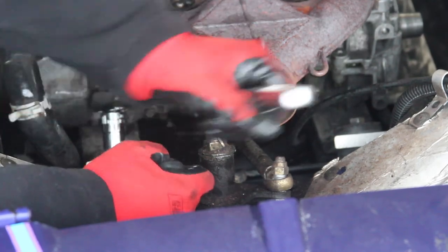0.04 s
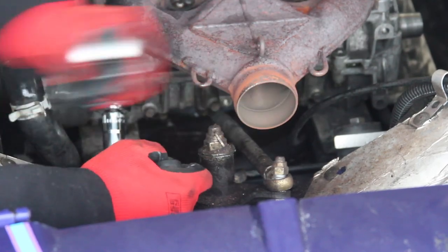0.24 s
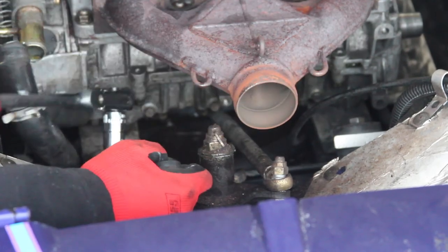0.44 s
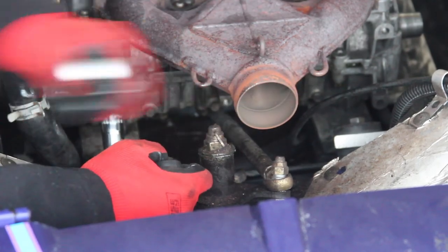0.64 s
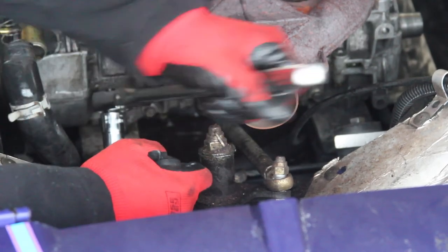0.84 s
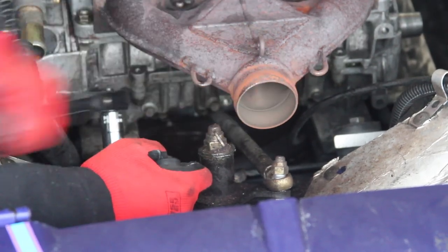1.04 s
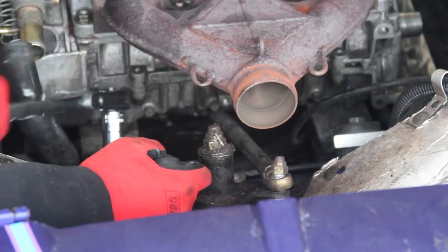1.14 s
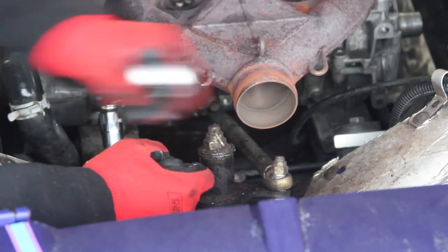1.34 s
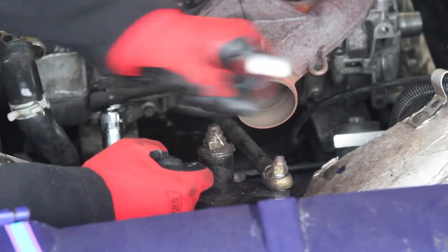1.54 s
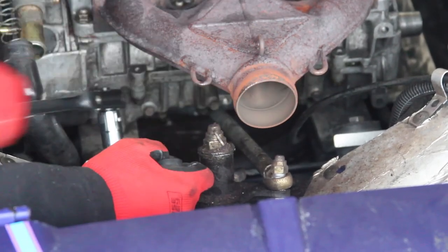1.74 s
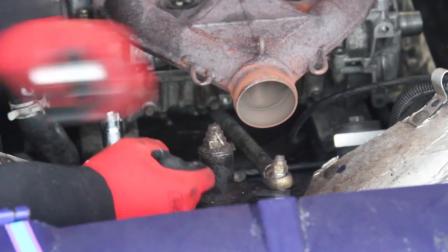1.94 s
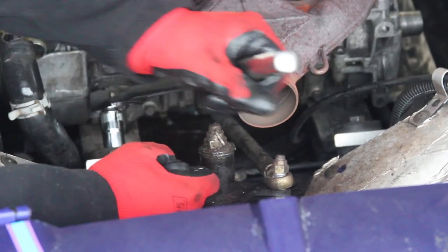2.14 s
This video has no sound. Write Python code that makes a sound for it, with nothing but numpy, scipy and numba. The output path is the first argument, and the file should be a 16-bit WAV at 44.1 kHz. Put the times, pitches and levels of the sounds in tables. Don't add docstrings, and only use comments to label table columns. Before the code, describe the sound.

Close-miked socket ratchet in an open engine bay, clicking on each back swing and clunking as it bites. After the first clunk a pipe is struck and rings, then two more strokes follow in a humming, echoing garage.

```python
import sys
import numpy as np
from scipy import signal
from scipy.fft import rfft, irfft
from scipy.io import wavfile
from scipy.ndimage import uniform_filter1d
from numba import njit

SR = 44100
rng = np.random.default_rng(int(sys.argv[2]) if len(sys.argv) > 2 else 0)


def bounce(signal):
    frames = np.transpose(np.atleast_2d(signal))
    limited = np.clip(frames, -1, 1)
    pcm = np.round(limited * 32767).astype(np.int16)
    wavfile.write(sys.argv[1], SR, pcm)


def rack_gain(trim_db):
    fader = np.asarray(trim_db, float)
    return 10 ** (fader / 20)


N = 97020

GRIT_DB = 2


def unit(x):
    return x / np.sqrt(np.mean(x ** 2))


def noise(points, tilt_db=0.):
    hz, level = np.array(points).T
    f = np.maximum(np.arange(N // 2 + 1) * SR / N, 1)
    db = np.interp(np.log(f), np.log(hz), level)
    db = db + tilt_db * np.log2(np.maximum(f, 300) / 4000)
    return unit(irfft(rfft(rng.standard_normal(N)) * rack_gain(db), N))


def ring(x, hz, width):
    b, a = signal.iirpeak(min(hz, .45 * SR), hz / max(width, 2), SR)
    return signal.lfilter(b, a, x)


def body(x, peaks, spread_db=0.):
    chance = rng.standard_normal(len(peaks))
    out = 0
    for k, (hz, width, db) in enumerate(peaks):
        out = out + (-1) ** k * rack_gain(db + spread_db * chance[k]) * ring(x, hz, width)
    return out


def grit(db):
    steps = np.repeat(rng.standard_normal(N // 40 + 1), 40)
    return rack_gain(db * uniform_filter1d(steps, size=20)[:N])


def burst(t, rise, fall):
    t = np.maximum(t, 0)
    return (1 - np.exp(-t / rise)) * np.exp(-t / fall)


def slow_noise(size):
    smooth = uniform_filter1d(rng.standard_normal(N), size=size)
    return unit(uniform_filter1d(smooth, size=size))


# (frequency [Hz], level [dB])
HUM_COLOUR = [(15, -4), (25, -9.5), (354, -4.5), (463, -1), (531, -9.5), (840, -2.5), (5880, -24),
              (13200, -43.5), (16000, -34)]
# (frequency [Hz], width [Hz], level [dB])
WHINE = [(12600, 920, -64), (13200, 400, -61.5), (14200, 900, -69), (66.7, 6.7, -56)]


def garage():
    hum_db = -39.5 + 1.42 * slow_noise(3000)
    whine = 0
    for hz, width, db in WHINE:
        narrow = ring(ring(rng.standard_normal(N), hz, width), hz, width)
        whine = whine + rack_gain(db) * unit(narrow)
    return rack_gain(hum_db) * noise(HUM_COLOUR) + whine


# (time [s], level [dB], decay [ms], tilt [dB per octave])
KNOCKS = [
    (0.0931, -26.5, 22.5, -0.5),
    (.174, -43, 16, 4),
    (0.28, -20.5, 21, 2),
    (0.952, -28, 16, -0.5),
    (1.500, -23, 19, -2),
    (1.591, -32, 30, -1),
    (1.656, -24.5, 9.3, 3),
    (1.916, -23.5, 15, 4.5),
    (1.903, -24, 7.2, 1.5),
    (2.075, -37.5, 12, 1.5),
]
# (frequency [Hz], level [dB])
KNOCK_COLOUR = [(71, -34), (150, -6), (892, 2), (1860, -6), (2200, -2.5), (3170, -11), (13000, -32.5),
                (16000, -55)]
# (time [s], level [dB])
SHUDDER = [(.39, -29), (1.09, -30), (1.77, -34.5)]


def knocks(t):
    soft, swell = 0, 0
    for s, db, ms, tilt in KNOCKS:
        env = burst(t - s, 0.0012, ms / 1000) * grit(GRIT_DB)
        soft = soft + rack_gain(db) * env * noise(KNOCK_COLOUR, tilt)
    for s, db in SHUDDER:
        swell = swell + rack_gain(db + 3) * burst(t - s, 0.14, 0.08)
    shudder_hz = 78
    return soft + swell * np.sin(2 * np.pi * shudder_hz * t)


# (start [s], end [s], level [dB])
SWINGS = [
    (0.153, 0.39, -28),
    (0.927, 1.056, -30.5),
    (1.532, 1.73, -32),
]
# (frequency [Hz], level [dB])
SWING_COLOUR = [(59, -43), (100, -35), (521, 3), (1750, -3), (2020, -4), (6080, -20), (8000, -49),
                (10400, -45), (17600, -120)]


def swings(t):
    grow = 0
    for start, end, db in SWINGS:
        rise = np.clip((t - start) / (end - start), 0, 1) ** 0.8
        grow = grow + rack_gain(db) * rise * np.exp(-np.maximum(t - end, 0) / 0.009)
    flutter = unit(uniform_filter1d(rng.standard_normal(N), size=500))
    return grow * rack_gain(2 * flutter) * grit(0.57) * noise(SWING_COLOUR)


# (time [s], level [dB], chatter [ms], loudest note [Hz], share into the block [dB])
PAWL_DROPS = [(0.2245, -42, 4.6, 6300, 13), (0.2291, -21, 5, 11730, -6), (0.2833, -22.5, 7.7, 11400, -16),
              (0.3257, -32, 12, 14200, -7), (0.34, -25, 15, 3700, 0), (.9543, -39, 11, 3460, -12),
              (0.987, -25.5, 20, 8500, -10), (1.0252, -28, 13, 8800, -11), (1.0609, -26.5, 15, 4840, 4.5),
              (1.6328, -31.5, 20, 4960, -2.5), (1.661, -30, 16, 13000, 1.5), (1.704, -31, 4.9, 3340, -4),
              (1.7088, -19.5, 14, 7980, -2), (1.7298, -29, 30, 9890, 5.5), (1.8595, -26.5, 15, 8130, -23)]
# (frequency [Hz], width [Hz], level [dB])
PAWL_RINGS = [(2180, 53, -4), (3460, 140, 3), (4060, 750, -13), (4730, 110, 9), (7020, 230, -3.5),
              (7760, 350, 6), (9200, 200, 3), (9500, 160, -9), (11770, 200, 2), (12100, 160, -10),
              (14400, 240, 0.5)]
# (frequency [Hz], level [dB])
PAWL_COLOUR = [(800, 4), (2000, -20), (3500, 15.5), (6000, 7.5), (9000, 7), (12000, 8), (14000, 2),
               (16000, 4)]
# (frequency [Hz], width [Hz], level [dB])
BLOCK = [(350, 64, -6.5), (761.3, 16.3, 1.5), (1000, 280, -12.5), (1773, 246, -7), (2370, 340, -13),
         (2810, 200, -10.5), (3485, 140, -14), (4470, 400, -17), (6860, 100, -25.5), (7600, 80, -33)]


def snap_twice(u, fall):
    return burst(u, .00012, fall) + rack_gain(-2) * burst(u - .0053, .00012, fall)


def pawl(t):
    out = np.zeros(N)
    block_gain = 1 / np.std(body(rng.standard_normal(N), BLOCK))
    for s, db, ms, hz, block_db in PAWL_DROPS:
        u = t - s
        let_go = 1 + np.exp(np.clip((u - ms / 1000) / 0.004, -50, 50))
        chatter = burst(u, 0.0004, 1.4 * ms / 1000) / let_go
        snap = rack_gain(7) * snap_twice(u, .0014)
        tail = rack_gain(-9.5) * burst(u, 0.00078, 0.023)
        env = (1.21 * chatter + snap + tail) * grit(GRIT_DB)
        force = env * rng.standard_normal(N)
        rings = body(force, PAWL_RINGS, 3)
        rings = rack_gain(-6) * rings * np.sqrt(np.sum(env ** 2) / np.sum(rings ** 2))
        note = rack_gain(-3) * snap_twice(u, .005) * np.sin(2 * np.pi * hz * u)
        block = rack_gain(block_db) * block_gain * body(force, BLOCK)
        out += rack_gain(db - 6.5) * (env * noise(PAWL_COLOUR) + rings + note + block)
    return out


# (time [s], frequency [Hz], level [dB], decay [ms])
THUDS = [
    (0.2821, 258, -25.5, 12),
    (0.3689, 248, -2, 7),
    (0.406, 155, -21.5, 27),
    (.954, 1370, -24, 15),
    (1.079, 350, -18, 12),
    (1.753, 365, -27, 6.6),
    (1.753, 1580, -27, 6.7),
    (1.92, 1340, -12.5, 11),
]


def thuds(t):
    out = 0
    for s, hz, db, ms in THUDS:
        out = out + rack_gain(db) * burst(t - s, 0.006, ms / 1000) * np.sin(2 * np.pi * hz * (t - s))
    return out


def strike(t, row, peaks, blow_colour, grind_colour, ring_db, struck_db, fall, tilts=(0, 0), panel=0):
    s, blow_db, grind_db, length, bounce_ms = row
    u = t - s
    rise = 0.0004
    blow = burst(u, rise, fall) + .55 * burst(u - bounce_ms / 1000, rise, fall)
    blow = blow * grit(GRIT_DB) * rack_gain(blow_db)
    crack = rack_gain(blow_db) * burst(u, 0.00024, 0.0012) * noise(blow_colour, 1)
    fade_db = -32.5 * np.clip(u, 0, length) - 130 * np.maximum(u - length, 0)
    grind = burst(u, 0.0017, 9.7) * rack_gain(grind_db + fade_db) * grit(1.36)
    white = rng.standard_normal(N)
    gain = 1 / np.std(body(white, peaks))
    force = (rack_gain(struck_db) * blow + rack_gain(ring_db) * grind) * white
    rung = gain * body(force, peaks)
    direct = blow * noise(blow_colour, tilts[0]) + grind * noise(grind_colour, tilts[1])
    return uniform_filter1d(grind, size=400) * panel + crack + direct + rung


def boom(t, notes):
    first_hz, second_hz, db = notes
    out = 0
    for hz in (first_hz, second_hz):
        waver = rack_gain(2 * slow_noise(700))
        out = out + waver * np.sin(2 * np.pi * (hz * t + rng.random()))
    return rack_gain(db) * out


# (time [s], blow level [dB], grind level [dB], grind length [s], bounce [ms])
CLUNKS = [
    (0.3689, -8, -20, 0.14, 2.7),
    (1.0741, -5, -20.5, 0.15, 4.15),
    (1.753, -8.5, -22.5, 0.094, 6.2),
]
# (blow tilt [dB per octave], grind tilt [dB per octave])
CLUNK_TILTS = [(8, 2), (4, 0), (3, 2)]
# (first note [Hz], second note [Hz], level re grind [dB])
BOOMS = [(234.2, 200, -17), (330.2, 378, -2.5), (328.7, 368, -5)]
# (frequency [Hz], width [Hz], level [dB])
BLOCK_FIRST = [(284, 130, -1), (735, 76, 2.5), (952, 99, -3), (1375, 91, -10), (1694, 110, -5.5),
               (2150, 460, -8), (2936, 150, -12), (3500, 90, -17), (4770, 130, -20)]
BLOCK_LAST = [(350, 57, -4.5), (747, 33, -6.5), (1414, 72, -17), (1635, 120, -9.5), (1770, 48, -8.5),
              (2160, 160, -14.5), (3020, 57, -15), (3700, 480, -25.5)]
# (frequency [Hz], level [dB])
BLOW_COLOUR = [(59, -36), (130, -18), (570, -8), (991, 21.5), (2750, 9), (3050, 9.5), (3940, 4), (7770, -5),
               (16000, -24)]
GRIND_COLOUR = [(40, -48), (100, -27.5), (220, -1.5), (360, -5), (490, -23), (800, -12), (1800, -17.5),
                (16000, -61.5)]


def clunks(t):
    out = 0
    blocks = (BLOCK_FIRST, BLOCK, BLOCK_LAST)
    for row, tilts, notes, peaks in zip(CLUNKS, CLUNK_TILTS, BOOMS, blocks):
        out = out + strike(t, row, peaks, BLOW_COLOUR, GRIND_COLOUR, ring_db=0, struck_db=-3.5,
                           fall=0.0062, tilts=tilts, panel=boom(t, notes))
    return out


# (time [s], blow level [dB], scrape level [dB], scrape length [s], bounce [ms])
TAP = [(.7570, -5, -27, 0.17, 4.2)]
# (frequency [Hz], width [Hz], level [dB])
PIPE = [(698, 24, -8), (2220, 28, -12), (2585, 45, -6), (3400, 48, -10), (4150, 60, -12), (4940, 35, -10),
        (5880, 70, -11), (7540, 80, -16), (10750, 340, -25), (11060, 510, -25), (13000, 1000, -29)]
# (frequency [Hz], level [dB])
TAP_COLOUR = [(120, -54), (200, -37), (671, -29), (1450, -5), (2250, -6.5), (5840, -2.5), (6880, -12),
              (13600, -9), (16000, -29)]
PIPE_COLOUR = [(59, -58), (100, -24), (350, -6), (461, -12), (691, -6), (1450, -15.5), (2520, -8),
               (13200, -62), (16000, -45)]


def pipe_tap(t):
    return strike(t, TAP[0], PIPE, TAP_COLOUR, PIPE_COLOUR, ring_db=-6, struck_db=-3.5, fall=0.0036)


PIPE_HZ = [2226, 5950, 697, 2218, 2430, 2562, 2606, 3381, 4161, 4936, 5755, 5900, 7564]
# (level [dB], t60 [s], rise [s])
PIPE_NOTES = [(18, 0.0071, 0.0022), (-16, 0.081, 0.0022), (-36, .6, .002), (-31, 0.9, 0.0022),
              (-42, 0.7, .002), (-36, 1, .002), (-31, 1., .002), (-37, 0.13, 0.0015), (-47, 0.84, .002),
              (-61, 0.42, 0.0017), (-37, .41, .002), (-41, 0.47, .002), (-54, 0.46, .002)]
# (frequency [Hz], level [dB], time to the top [s], width [s])
PIPE_HUM = (695, -13, .019, .013)


def pipe_notes(t):
    u = np.maximum(t - .7572, 0)
    hz, db, top, width = PIPE_HUM
    swell = burst(u, .006, 9) * np.exp(-((u - top) / width) ** 2 / 2)
    out = rack_gain(db) * swell * np.sin(2 * np.pi * hz * u)
    for hz, (db, t60, rise) in zip(PIPE_HZ, PIPE_NOTES):
        out = out + rack_gain(db) * burst(u, rise, t60 / np.log(1000)) * np.sin(2 * np.pi * hz * u)
    return out


# (frequency [Hz], t60 [s])
ROOM_T60 = [(100, 0.079), (350, 1), (900, 1), (2000, 1), (6000, 0.12), (14000, 0.37)]


def room(x, t):
    hz_points, t60_points = np.array(ROOM_T60).T
    tail = 0
    for hz in 90 * 2 ** np.arange(0, 7.6, .5):
        t60 = np.interp(np.log(hz), np.log(hz_points), t60_points)
        tail = tail + ring(rng.standard_normal(N), hz, hz / 1.05) * rack_gain(-60 * t / t60)
    tail = tail * (t > 0.0032)
    tail = tail / np.sqrt(np.sum(tail ** 2))
    return signal.fftconvolve(x, tail)[:N] * rack_gain(-11.5)


def scene():
    t = np.arange(N) / SR
    close = knocks(t) + swings(t) + pawl(t) + clunks(t) + pipe_tap(t)
    return (garage() + close + room(close, t) + thuds(t) + pipe_notes(t))[None]


@njit
def follow(x, fall):
    e, out = 0., np.empty(len(x))
    for i in range(len(x)):
        e = max(abs(x[i]), e * fall)
        out[i] = e
    return out


def band_limit(x):
    return signal.sosfilt(signal.butter(12, 16370, fs=SR, output="sos"), x)


def record(dry):
    low_cut = signal.butter(5, 40, "high", fs=SR, output="sos")
    dry = signal.sosfilt(low_cut, dry)
    limit_db, ratio, release_s, drive_db = -21, 1.14, 0.23, 1.5
    level = uniform_filter1d(follow(dry[0], np.exp(-1 / (release_s * SR))), size=400)
    gain = np.minimum(1, rack_gain(limit_db) / level) ** (1 - 1 / ratio)
    clipped = np.clip(dry * gain * rack_gain(drive_db), -1, 1)
    top_cut = signal.ellip(14, .3, 55, 15800, fs=SR, output="sos")
    return band_limit(signal.sosfilt(top_cut, clipped))


dry = scene()
out = record(dry)
bounce(out)
```